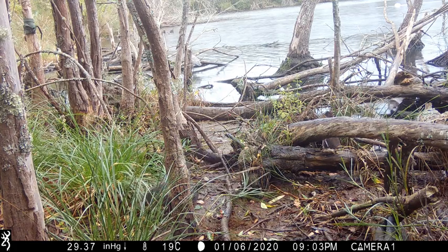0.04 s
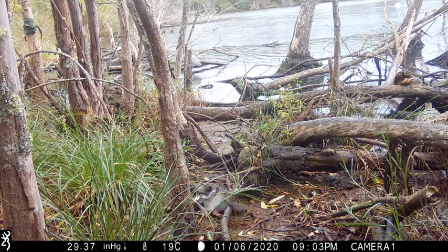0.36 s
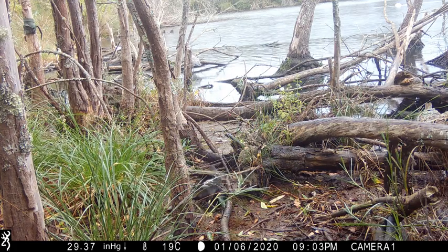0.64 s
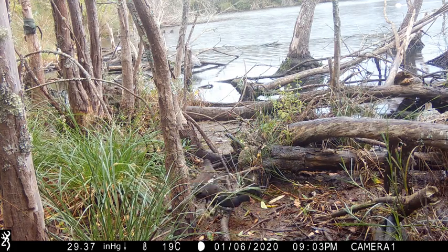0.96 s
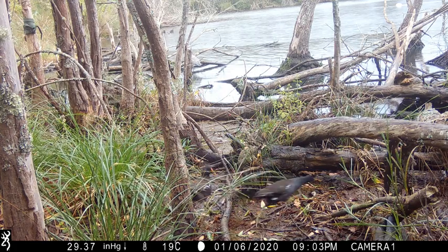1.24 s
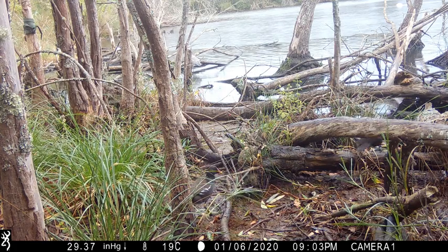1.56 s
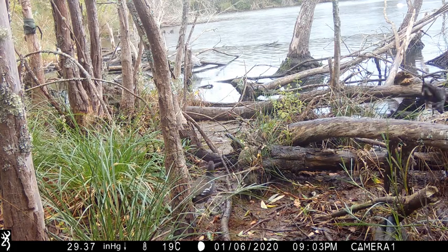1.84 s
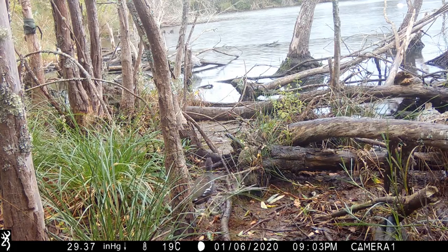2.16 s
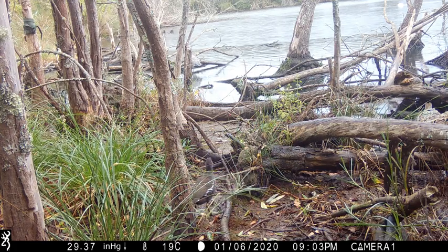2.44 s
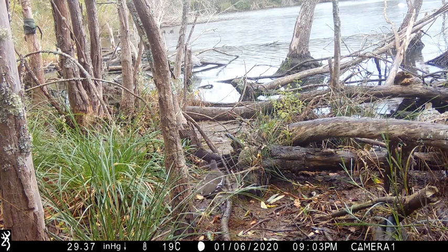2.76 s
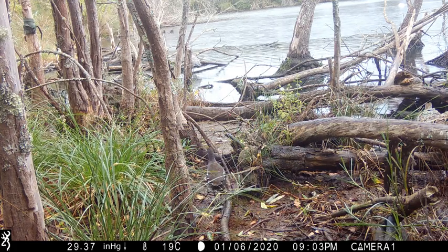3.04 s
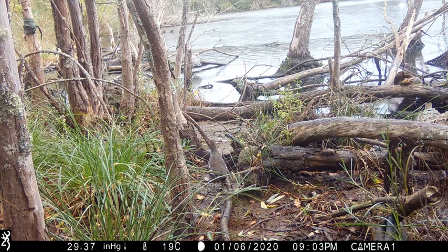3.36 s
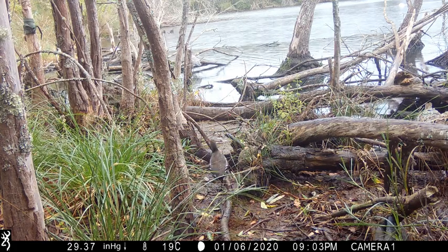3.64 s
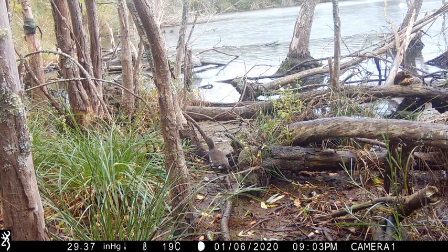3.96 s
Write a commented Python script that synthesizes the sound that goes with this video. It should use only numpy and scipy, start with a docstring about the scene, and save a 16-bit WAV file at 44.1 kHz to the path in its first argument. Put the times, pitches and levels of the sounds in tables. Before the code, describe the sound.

Birds squabble in dead leaves right from the start. A very short falling cluck comes at 0.1 seconds, amid sharp clicks and scuffs of feet and wings. From 0.4 to 0.6 seconds one gives a harsh rasp with a thin whistle in it. The rustling fades by about 1 second. Faint twig ticks follow now and then, over a soft, steady wash of wind and water lasting until 4 seconds.

```python
"""Marsh birds squabble in dead leaves beside a lake: one gives a short cluck, feet and wings scuffle,
a harsh rasp follows, and one runs off. The cluck is a falling note; the rasp is pulses and puffs of air
ringing in the throat. The leaves are many tiny clicks. Twigs tick now and then over a steady wash
of wind and water, and a trail camera's electronics add a thin whine."""
import sys
import numpy as np
from scipy import signal
from scipy.fft import rfft, irfft
from scipy.io import wavfile
from scipy.ndimage import uniform_filter1d, map_coordinates

SR = 44100
rng = np.random.default_rng(int(sys.argv[2]) if len(sys.argv) > 2 else 0)


def wrap_up_sound(samples):
    """Save the sound to the file named by the first command line argument, as 16-bit audio."""
    columns = np.atleast_2d(samples).T
    # keep every value between -1 and 1, then stretch to whole-number steps
    tamed = np.clip(columns, -1, 1)
    steps = np.round(tamed * 32767).astype(np.int16)
    wavfile.write(sys.argv[1], SR, steps)


N = 176400  # 4 seconds

# tone of dead leaves when brushed or struck: (frequency [Hz], level [dB])
LITTER_TONE = [(60, -38), (120, -27), (230, -8.5), (400, -5.5), (700, 2.5), (1100, 5.5), (1900, 3),
               (2800, -4), (4000, -15), (5300, -17.5), (7000, -40.5), (10300, -32.5), (13000, -64),
               (16000, -70)]


def amp(db):
    """Turns decibels into a gain."""
    return 10 ** (np.asarray(db) / 20)


def evened(x):
    """Scales a signal to an average size (rms) of 1."""
    return x / np.sqrt(np.mean(x ** 2) + 1e-20)


def level_at(tone, hz):
    """Looks up a tone table's dB at given frequencies."""
    f, db = np.transpose(tone)
    return np.interp(np.log(hz + 1), np.log(f + 1), db)


def follow(table, t):
    """Looks up a table's columns at given times."""
    times, *columns = np.transpose(table)
    return [np.interp(t, times, c) for c in columns]


def add(mix, start_s, sound):
    """Mixes a sound in at a given time."""
    part = mix[max(round(start_s * SR), 0):][:len(sound)]
    part += sound[:len(part)]


def colour(x, tone, tilt_db=0, size=4096):
    """Filters a sound by a tone table; tilt_db per octave brightens it."""
    hz = np.fft.rfftfreq(size, 1 / SR)
    octaves = np.log2(np.clip(hz, 400, 6000) / 1500)
    log_gain = np.log(amp(level_at(tone, hz) + tilt_db * octaves))
    mirrored = np.r_[log_gain, log_gain[-2:0:-1]]
    response = np.exp(np.conj(signal.hilbert(mirrored)))  # rings after a click, never before
    taps = np.fft.ifft(response).real
    return signal.oaconvolve(x, taps[:size // 2])[:len(x)]


def drift(n, rate_hz):
    """A smooth random wobble of average size 1."""
    knots = rng.standard_normal(4096)
    return evened(map_coordinates(knots, [np.arange(n) * rate_hz / SR], order=3, mode="wrap"))


def crackle(n, per_s, spread_db):
    """Clicks at random times; spread_db makes their sizes uneven."""
    sizes = amp(spread_db * np.minimum(rng.exponential(1, n), 4))
    return sizes * rng.choice([-1., 1.], n) * (rng.random(n) < per_s / SR)


def wind_and_water(flutter_db=0.08, lap_db=-0.27):
    """Far wind and water make a dull hiss whose bands waver gently and separately."""
    # tone of the hiss: (frequency [Hz], level [dB])
    tone = [(25, -26), (48, -18), (85, -20.5), (170, -18.5), (270, -15), (400, -13.5), (520, -8), (650, -6),
            (820, -4), (980, 1), (1120, -2), (1310, -6), (1550, -7), (2160, -14.5), (2970, -22.5),
            (3550, -26), (4990, -29.5), (5590, -39.5), (6500, -50.5), (8000, -60.5), (12000, -78)]
    # its loudness: (time [s], level [dB])
    loudness = [(0, -49.5), (1.3, -50), (2.2, -50), (2.55, -50), (3.1, -51), (4, -51)]
    _, _, bands = signal.stft(rng.standard_normal(N), SR, nperseg=512, noverlap=384)
    patches = uniform_filter1d(rng.standard_normal(bands.shape), size=7, axis=0)
    patches = evened(uniform_filter1d(patches, size=14, axis=1))
    noise = signal.istft(bands * amp(lap_db * patches), SR, nperseg=512, noverlap=384)[1][:N]
    level, = follow(loudness, np.arange(N) / SR)
    return evened(colour(noise, tone)) * amp(level + flutter_db * drift(N, 24.9))


def tree_echoes(x, echo_db=-16, fade_s=0.14, size=16384):
    """Trunks and logs scatter faint echoes back."""
    t = np.arange(size) / SR
    tail = crackle(size, per_s=1500, spread_db=0.77) * amp(-60 * t / fade_s) * (t > .004)
    return x + amp(echo_db) * signal.oaconvolve(x, tail / np.linalg.norm(tail))[:N]


def twig_snaps(mix, rise_s=.0015, fade_s=.022, size=2048):
    """Twigs give way and ring briefly in three bands: body, crack and fizz."""
    # each snap: (time [s], body frequency [Hz], body [dB], crack [dB], fizz [dB])
    snaps = [(.96, 2900, -57, -66, -87), (1.126, 3300, -62, -64, -90), (1.362, 2700, -64, -72, -85),
             (1.49, 2800, -56, -65, -90), (1.652, 3500, -66, -73, -85), (1.711, 2700, -66, -67, -86),
             (1.729, 3000, -56, -67, -75), (1.761, 2700, -63, -66, -81), (1.822, 2700, -54, -69, -92),
             (1.828, 3000, -57, -74, -92), (1.899, 2700, -62, -66, -84), (2.879, 1900, -50, -75, -92),
             (2.881, 3000, -54, -78, -92), (2.886, 3000, -53, -78, -92), (2.914, 4000, -61, -74, -92),
             (3.033, 2300, -55, -76, -85), (3.547, 2700, -67, -75, -78)]
    # the crack and fizz bands: (frequency [Hz], width [octaves])
    high_bands = [(5100, .15), (9800, .11)]
    t = np.arange(size) / SR
    hz = np.fft.rfftfreq(size, 1 / SR) + 1
    shape = np.minimum(t / rise_s, 1) * amp(-60 * np.maximum(t - 2 * rise_s, 0) / fade_s)
    for time, body_hz, *levels in snaps:
        ring = np.zeros(size)
        for db, (centre, width) in zip(levels, [(body_hz, 0.26)] + high_bands):
            band = np.exp(-.5 * (np.log2(hz / centre) / width) ** 2)
            ring += amp(db) * evened(irfft(rfft(rng.standard_normal(size)) * band))
        add(mix, time - rise_s, ring * shape)


def leaf_rustle(clump_db=3.0):
    """Stirred leaves give clumps of tiny clicks that fade as the bird runs off."""
    # loudness of the rustle: (time [s], level [dB])
    loudness = [(0, -56.5), (.11, -57.5), (.165, -62), (.22, -59.5), (.31, -59.5), (.4, -58.5),
                (.52, -55.5), (.59, -64.5), (.63, -59), (.68, -55.5), (.72, -61), (.8, -65.5), (.885, -59),
                (.91, -61), (.95, -58), (1.05, -70), (1.7, -73), (4, -69)]
    # tone of the leaves: (frequency [Hz], level [dB])
    tone = [(300, -27.5), (1000, 13), (2500, 5.5), (4000, 2), (5300, -2), (7000, -20.5), (8800, -18.5),
            (10400, -15), (12500, -31), (16000, -52)]
    level, = follow(loudness, np.arange(N) / SR)
    clicks = crackle(N, per_s=2000, spread_db=0) * amp(clump_db * drift(N, 70))
    return evened(colour(clicks, tone)) * amp(level)


def scuffs(mix, size=8192):
    """Feet and wings brush the leaves into brief swells of dense crackle."""
    # each stroke: (peak time [s], rise [s], fall [s], level [dB], brightness [dB per octave])
    strokes = [(0.014, 0.0099, 0.0045, -49.5, -2.5), (0.059, .008, 0.0088, -53, -3),
               (0.139, 0.0048, 0.0063, -43.5, -2.5), (.155, .009, 0.0055, -42.5, 4),
               (.166, 0.0025, 0.0017, -34.5, 2), (.179, 0.0072, 0.0074, -38.5, 2.5),
               (.2, 0.0091, 0.012, -56, -7), (.263, 0.0044, 0.0059, -44, 0.5),
               (.357, 0.015, 0.019, -47, -3.5)]
    t = (np.arange(size) - size // 2) / SR
    for time, rise, fall, db, tilt_db in strokes:
        swell = np.exp(-.5 * (t / np.where(t < 0, rise, fall)) ** 2)
        clicks = crackle(size, per_s=7000, spread_db=0.5)
        sound = evened(colour(clicks, LITTER_TONE, tilt_db)) * swell * amp(db)
        add(mix, time + t[0], sound[time + t >= 0])


def knocks(mix, scatter_gain=0.15, fade_s=0.019, size=2048):
    """Feet and bills strike the leaves: a sharp click, then a little scatter."""
    # each blow: (time [s], peak level [dB], brightness [dB per octave])
    blows = [(0.0877, -31, 1.5), (0.165, -35.5, -7), (0.1722, -27, -2), (0.179, -34, 1), (0.2604, -33, 9),
             (0.3923, -40, 1.5), (0.4005, -44, 8)]
    t = np.arange(size) / SR
    for time, db, tilt_db in blows:
        scatter = scatter_gain * rng.standard_normal(size) * amp(-60 * t / fade_s)
        sound = colour(signal.unit_impulse(size) + scatter, LITTER_TONE, tilt_db)
        add(mix, time, -amp(db) * sound / abs(sound).max())


def whistle(waver=0.0096, rough_db=3):
    """A thin, unsteady tone in the middle of the rasp."""
    # the whistled note: (time [s], pitch [Hz], level [dB])
    note = [(.415, 2624, -61), (.435, 2640, -51), (.452, 2700, -52), (.469, 2760, -45), (.483, 2640, -46),
            (.5, 2680, -68)]
    t = np.arange(note[0][0], note[-1][0], 1 / SR)
    hz, level = follow(note, t)
    cycles = np.cumsum(hz * (1 + waver * drift(len(t), 240))) / SR
    tone = np.sin(2 * np.pi * cycles) * amp(rough_db * drift(len(t), 320))
    return t[0], evened(tone) * amp(level)


def cluck(waver=0.014, rough_db=1):
    """A very short falling note; the throat favours the overtone at twice its pitch."""
    # the clucked note: (time [s], pitch [Hz], level [dB])
    note = [(.088, 930, -62), (0.091, 830, -40.5), (0.097, 832, -34), (.101, 727, -38), (.1045, 697, -36),
            (0.11, 710, -42)]
    # tone of the throat: (frequency [Hz], level [dB])
    throat = [(700, -6), (900, -7), (1400, -4.5), (1650, 2.5), (2150, -7), (2350, -18), (3300, -36),
              (4100, -22), (5000, -43)]
    t = np.arange(note[0][0], note[-1][0], 1 / SR)
    hz, level = follow(note, t)
    cycles = np.cumsum(hz * (1 + waver * drift(len(t), 550))) / SR
    voice = sum(amp(level_at(throat, k * hz)) * np.cos(2 * np.pi * k * cycles) for k in range(1, 8))
    soft_ends = signal.windows.tukey(len(t), .15)
    return t[0], evened(voice) * amp(level + rough_db * drift(len(t), 500)) * soft_ends


def rasp(waver=0.16, rough_db=2.0, leak=0.67, treble_hz=3400, dull_from_s=0.536, dull_db=-13):
    """A harsh scold: uneven pulses and puffs of air ring the throat; the treble fades at the end."""
    # the call: (time [s], level [dB], pulse rate [Hz], share of noise [0-1])
    call = [(.388, -58, 160, 0.7), (0.401, -39.5, 135, 0.3), (.425, -44, 180, 0.8), (.445, -40, 200, 1),
            (.472, -41, 200, 0.66), (0.513, -42.5, 210, 0.94), (0.542, -41, 190, 0.56),
            (.564, -39.5, 200, 0.43), (.572, -49, 230, .5), (.59, -57, 200, 0.88)]
    # tone of the throat: (frequency [Hz], level [dB])
    throat = [(120, -50), (300, -29), (450, -6), (620, -2.5), (770, 2), (1050, -2.5), (1250, -2.5),
              (1550, -2), (2000, -3), (2400, -7), (2750, -4), (3250, -10), (3600, -13), (4200, -16.5),
              (4800, -22), (5600, -51), (7300, -68), (12000, -80)]
    t = np.arange(call[0][0], call[-1][0], 1 / SR)
    level, rate, noisy = follow(call, t)
    cycles = np.cumsum(rate * np.exp(waver * drift(len(t), 250))) / SR
    pulses = np.diff(np.floor(cycles), prepend=0) * amp(rough_db * drift(len(t), 304))
    puffs = (leak + np.exp(-(cycles % 1) / 0.98)) * rng.standard_normal(len(t))  # one puff per pulse
    airflow = np.sqrt(1 - noisy) * evened(pulses) + np.sqrt(noisy) * evened(puffs)
    voice = evened(colour(airflow, throat))
    lows = signal.filtfilt(*signal.butter(2, treble_hz, fs=SR), voice)
    dulling = np.clip((t - dull_from_s) / 0.024, 0, 1)
    treble = (voice - lows) * amp(dull_db * dulling)
    return t[0], (lows + treble) * amp(level)


def scene():
    """Birds, leaves and twigs echo among the trees, over wind and water."""
    mix = leaf_rustle()
    for start_s, sound in (cluck(), rasp(), whistle()):
        add(mix, start_s, sound)
    scuffs(mix)
    knocks(mix)
    twig_snaps(mix)
    return (tree_echoes(mix) + wind_and_water())[None]


def record(dry, whine_hz=7797, flip_hz=29.7, whine_db=-84.5, hiss_db=-87, top_hz=15750):
    """The camera's electronics add a faint hiss and whine, then cut the highest treble."""
    t = np.arange(N) / SR
    flips = np.tanh(10 * np.sin(2 * np.pi * flip_hz * t))  # changes sign twice a cycle
    whine = np.sin(2 * np.pi * whine_hz * t) * flips
    electronics = amp(whine_db) * evened(whine) + amp(hiss_db) * rng.standard_normal(N)
    low_pass = signal.firwin(511, top_hz, window=("kaiser", 9), fs=SR)
    return signal.oaconvolve(dry + electronics, low_pass[None], "same")


dry = scene()
out = record(dry)
wrap_up_sound(out)
```